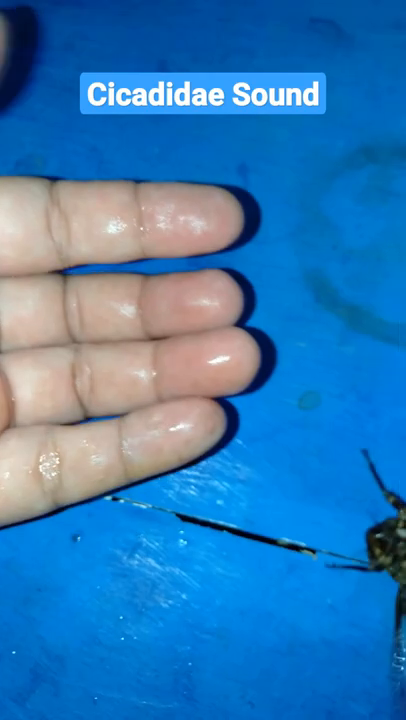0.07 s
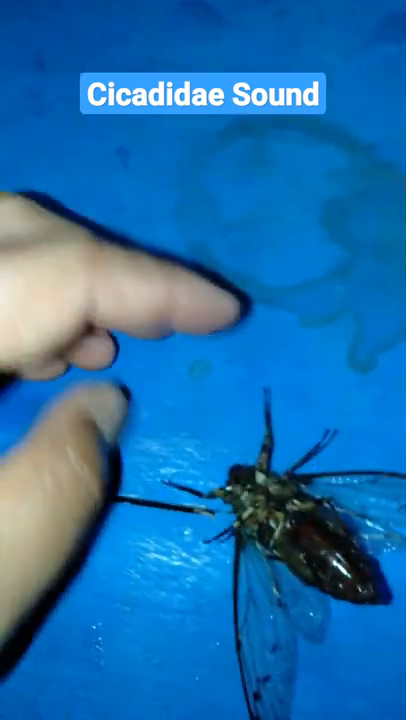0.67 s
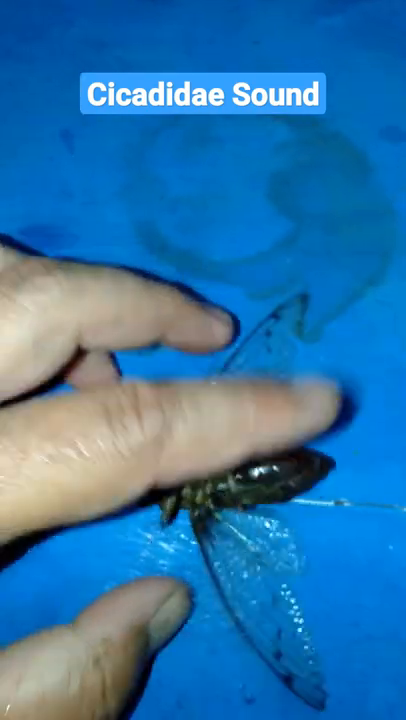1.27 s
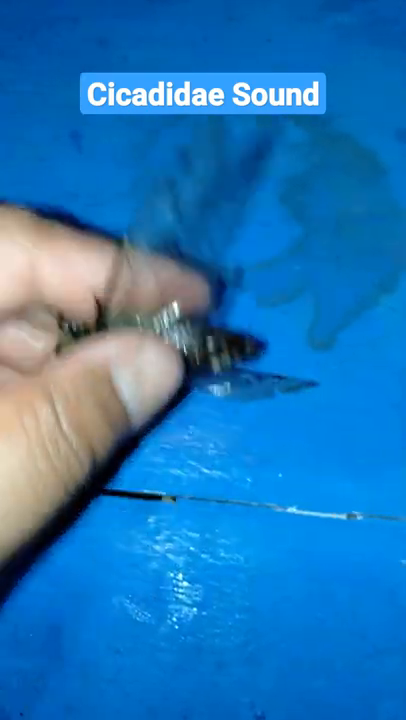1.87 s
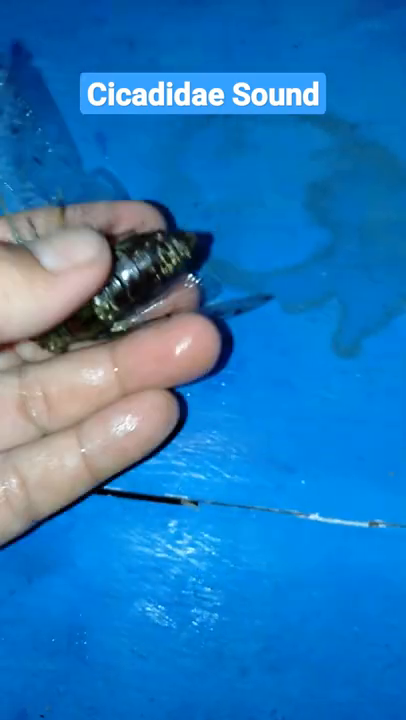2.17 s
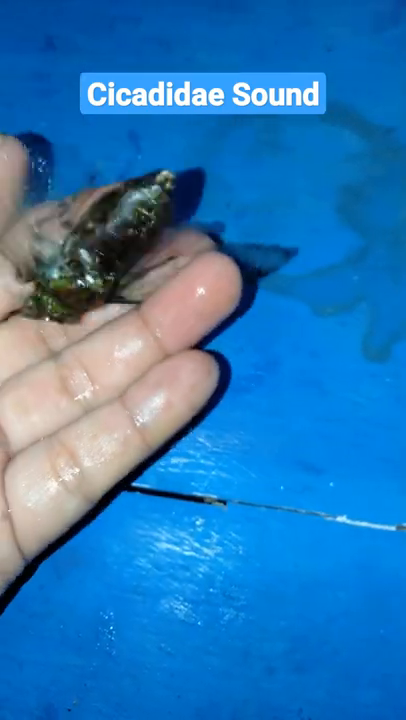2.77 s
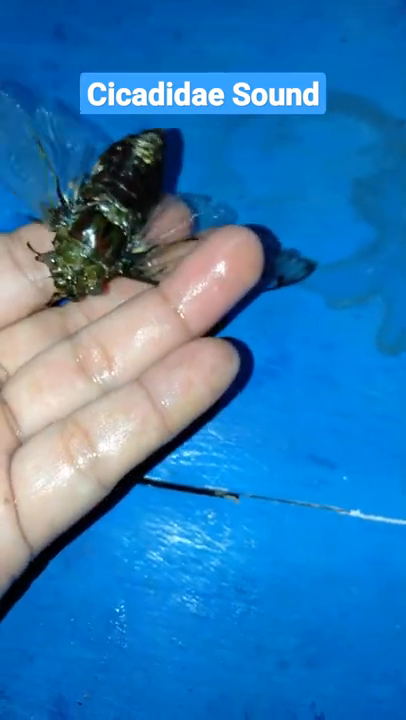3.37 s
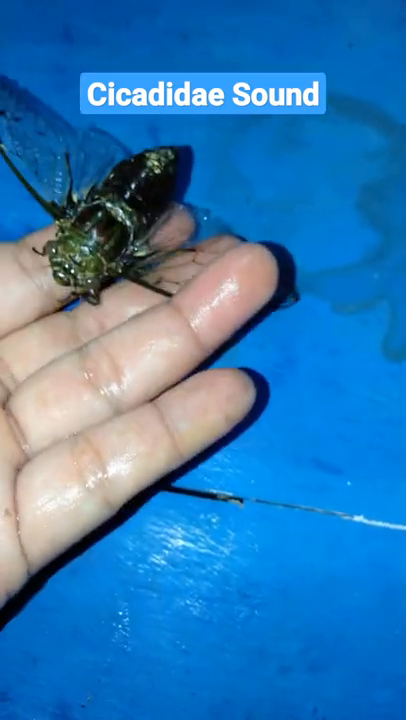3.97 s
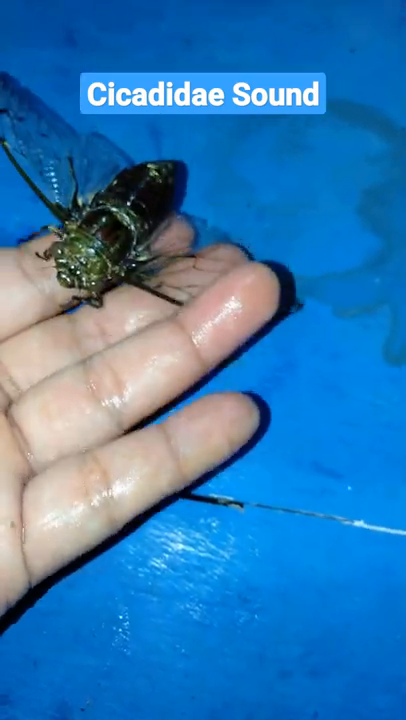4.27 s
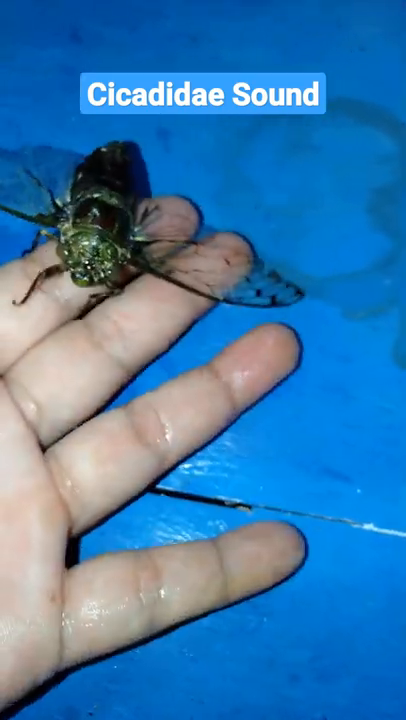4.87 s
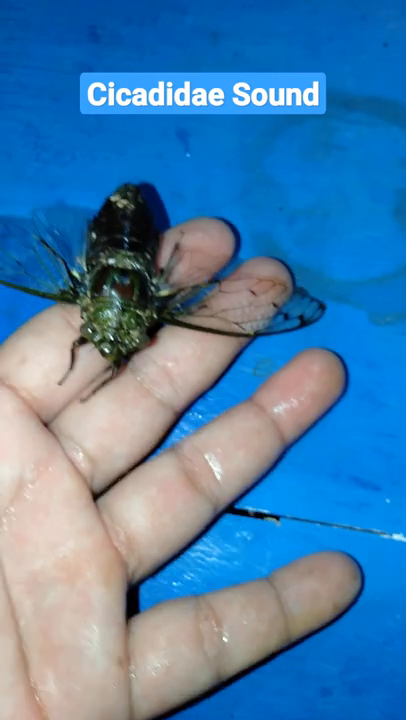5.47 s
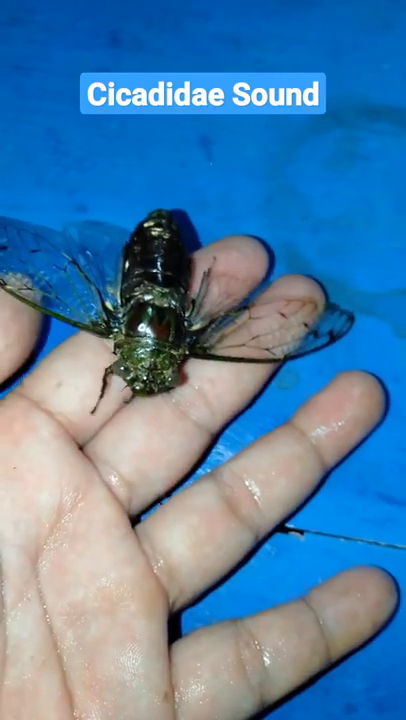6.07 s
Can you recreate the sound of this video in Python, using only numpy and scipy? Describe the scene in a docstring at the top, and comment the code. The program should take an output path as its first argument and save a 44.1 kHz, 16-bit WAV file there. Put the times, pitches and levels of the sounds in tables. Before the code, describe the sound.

Outdoors at night, a big cicada is picked up right next to the microphone. It lets out loud, harsh, buzzing screeches in short, irregular bursts. In the later bursts its dry wings flick quickly against the fingers in two brief flutters. After about four seconds it falls silent, leaving faint crickets and katydids trilling over a low rumble and hiss.

```python
"""Outdoors at night, at a table near walls: a big cicada is picked up by hand, close to the microphone.
It screeches in short protests and beats its wings. Its two tymbals buckle in turn, each about 100 times
a second: every stroke rings the hollow abdomen and snaps a row of ribs.
The walls return a faint echo; farther off, crickets and katydids sing over a low rumble and hiss."""
import sys
import numpy as np
from scipy import signal
from scipy.fft import rfft, irfft
from scipy.io import wavfile
from scipy.ndimage import uniform_filter1d

SR = 44100
rng = np.random.default_rng(int(sys.argv[2]) if len(sys.argv) > 2 else 0)


def transcribe(u):
    """Save the signal u as a 16-bit wav file named by the first command-line argument.

    u: samples, shape (n,) or (channels, n), limited to [-1, 1]; the rate is SR.
    q: integer samples, one column per channel.
    """
    v = np.clip(np.atleast_2d(u).T, -1, 1)
    q = np.round(v * 32767).astype(np.int16)
    wavfile.write(sys.argv[1], SR, q)


N = 274302
TIME = np.arange(N) / SR


def cicada():
    """Close to the microphone: one muscle rhythm drives both the abdomen and the ribs."""
    t, far = strokes()
    return abdomen(t, far) + ribs(t, far)


# screeches: start t/s, end t/s, stroke rate of one fresh tymbal f/Hz, abdomen f/Hz, its glide f/Hz,
# then relative: abdomen level/dB, rebound level/dB, rasp level/dB, rib ring level/dB, its change/dB
SCREECHES = [(.06, 0.158, 109.3, 1313, 60, -31, -28.5, -37, -46.5, 0),
             (0.281, 0.791, 108, 1277, -95, -29.5, -28.5, -34, -41, 7.5),
             (0.816, 0.973, 100.9, 1230, 0, -30.5, -33, -33.5, -34.5, -2.5),
             (.979, 1.115, 99.8, 1236, 30, -31, -33, -33, -34, 1),
             (1.143, 1.242, 99.9, 1240, 0, -31.5, -37, -33, -37, 2),
             (1.305, 1.44, 103.1, 1230, -30, -32.5, -42, -33, -35.5, 1.5),
             (1.609, 1.779, 108.8, 1220, 40, -34.5, -43.5, -34, -29, 0.5),
             (1.805, 1.86, 103, 1250, 30, -33.5, -38.5, -35.5, -32, -6),
             (1.968, 2.049, 105.8, 1215, 20, -35, -35.5, -37.5, -33.5, 0),
             (2.149, 2.271, 108, 1188, 60, -35, -36, -35.5, -29.5, -1.5),
             (2.614, 2.878, 109.8, 1252, 40, -35.5, -37, -36, -32.5, -4.5),
             (2.89, 2.961, 99.6, 1217, 20, -34, -38, -36, -38, 1),
             (3.03, 3.111, 105.5, 1260, 30, -33.5, -38, -36.5, -38.5, -4),
             (3.453, 3.541, 111, 1335, 50, -33.5, -36.5, -37, -39, -14),
             (3.562, 3.738, 105.3, 1390, 130, -31.5, -35.5, -37, -41, -5),
             (3.874, 3.938, 109.6, 1362, 40, -30.5, -36.5, -39, -35.5, -3)]
# the muscle falters in mid-screech: t/s, effort lost/share
FALTERS = [(.385, 0.088), (.517, 0.078), (.615, 0.059), (.69, 0.048), (1.022, .15), (1.215, 0.089),
           (1.381, .06), (2.8, 0.047), (3.575, .2)]


def muscle(times, tire_s=.1, release_s=.014, falter_s=.018, stretch_s=.0059):
    """Stroke rate, abdomen pitch and four levels: all sag as the muscle tires, falters and lets go."""
    rows = np.array(SCREECHES)
    which = np.searchsorted((rows[:-1, 1] + rows[1:, 0]) / 2, times)
    start, end, rate, pitch, glide, body_db, rebound_db, rasp_db, ring_db, change_db = rows[which].T
    age, left = np.clip(times - start, 0, end - start), np.maximum(end - times, 0)
    along = age / (end - start) - .5
    tiring = .12 * (1 - np.exp(-(age / tire_s) ** 2))
    release = .14 * np.exp(-left / release_s)
    faltering = sum(loss * np.exp(-((times - at) / falter_s) ** 2) for at, loss in FALTERS)
    slack = tiring + release + faltering  # share of the effort lost
    limp = np.exp(-age / stretch_s)  # the abdomen stretches at each start: its ring begins flat and weak
    return (rate * (1 - slack),
            (pitch + glide * along) * (1 - .04 * slack) - 59.7 * limp,
            body_db - 9 * slack - 1.6 * limp,
            rebound_db - 12.5 * slack,
            rasp_db - 8 * slack,
            ring_db + change_db * along - 8 * slack)


def strokes(lag_cycles=.48, stray_cycles=.029):
    """Stroke times and their tymbal (0 near, 1 far); the far one lags by a wandering half cycle."""
    rows, drift = [], walk(20)
    for start, end, *_ in SCREECHES:
        t = np.arange(start, end - .003, 1 / SR)
        cycles = np.cumsum(muscle(t)[0]) / SR
        stroke = np.arange(int(2 * cycles[-1]) + 1)
        far = stroke % 2
        even_times = np.interp(stroke / 2, cycles, t)
        lag = lag_cycles + stray_cycles * UNEVENNESS[posture(start)] * np.interp(even_times, TIME, drift)
        rows.append([np.interp(stroke // 2 + lag * far, cycles, t), far])
    times, far = np.concatenate(rows, axis=1)
    return jittered(times, ms=.14), far


# the insect is gripped, then perches: t/s
MOVES = [1.52, 2.45]


def posture(times):
    """0 lying on the table, 1 gripped, 2 perched on the fingers."""
    return np.searchsorted(MOVES, times)


# unevenness of the strokes when lying, gripped and perched: jitter/share
UNEVENNESS = [.3, 1, .65]


def jittered(times, ms):
    """Each time comes a little early or late, most of all while the insect is gripped."""
    return times + np.array(UNEVENNESS)[posture(times)] * ms * rng.standard_normal(len(times)) / 1000


# air modes of the abdomen: f/abdomen pitch, rise t/ms, relative level/dB
ABDOMEN_MODES = [(0.973, 0.76, 8), (1.17, 0.63, -3.5)]


def abdomen(t, far, drone_hz=710, rebound_hz=2020, rebound_s=.0042):
    """The air in the abdomen rings just after each stroke, and higher as the tymbal springs back."""
    _, pitch, body_db, rebound_db, _, ring_db = muscle(t)
    pitch = pitch * (1 + .02 * (1 - 2 * far)) * scatter(t, .1)
    push = undb(-1.5 * far) * scatter(t, .6)
    onset = t + .001864
    body = sum(grains(onset, push * undb(body_db + db + 3.5), peak_ms, ratio * pitch)
               for ratio, peak_ms, db in ABDOMEN_MODES)
    body = signal.sosfiltfilt(butter(4, [930, 1660], "band"), body)
    # the soft belly wall drones less evenly than the air inside, and grows with the rib ring
    drone_db = -36.5 + .53 * (ring_db + 34.5)
    drone = grains(jittered(onset, ms=.17), push * undb(drone_db), .9, drone_hz * scatter(t, .35))
    drone = signal.sosfiltfilt(butter(4, 570, "high"), drone)
    rebound = grains(t + rebound_s, push * undb(rebound_db + 1.5), 1, rebound_hz * scatter(t, .22))
    # the pumping itself hums faintly at the stroke rate
    throb = signal.sosfilt(butter(3, 160, "high"), grains(t, push * undb(body_db - 29), .53))
    return body + drone + rebound + throb


# tymbal modes as each posture shades them at the microphone:
# f/Hz, rise t/ms, then relative: lying level/dB, gripped level/dB, perched level/dB
TYMBAL_MODES = [(2540, .5, 1, -4.5, -7), (2930, 0.49, 0.5, -5, -10), (3183, 0.65, 1.5, 1, 0.5),
                (3861, 0.61, -9, 3.5, 8.5), (4204, 0.81, 5.5, 5, -5), (5660, 0.41, -12, -5, 5),
                (6125, 1, -4.5, -13, 7.5), (7940, 0.42, -9, -29, -9), (9700, 0.37, -13, -7, -7),
                (11080, 0.37, -12, -4.5, -8), (12550, 0.33, -10, -6, -9), (15400, 0.7, -1, -10, -5.5),
                (14820, 0.36, 3, 1.5, 2.5)]
# noise of the crumpling membrane: f/Hz, relative level/dB
CRUMPLE_SPECTRUM = [(1700, -12), (2400, -1), (3100, 4), (3700, -3), (4350, -0.5), (5300, -5), (6700, 0.5),
                    (9000, -9.5), (11000, -10.5), (12000, -30), (13600, -17), (14700, -19)]


def ribs(t, far, near_gap_s=.002, far_gap_s=.0017, ring_hz=6720):
    """Three ribs snap in turn in each stroke; every snap rings the tymbal and crumples it noisily."""
    rib = np.tile(np.arange(3), len(t))
    t, far = np.repeat(t, 3), np.repeat(far, 3)
    snaps = t + rib * np.where(far, far_gap_s, near_gap_s) + .00002 * rng.standard_normal(len(t))
    force = undb(-2 * rib) * scatter(snaps, 1.3)
    ring = grains(snaps, force * undb(-10 * far), .34, ring_hz * scatter(snaps, .19), count=256)
    force = force * undb(.5 * far)
    rasp = 0
    for hz, peak_ms, *shade_db in TYMBAL_MODES:
        # as the insect squirms, each mode drifts in strength and pitch
        sway, bend = (np.interp(snaps, TIME, walk(9)) for _ in range(2))
        mode_db = np.array(shade_db)[posture(t)] + 1.5 * sway
        size = force * undb(mode_db) / peak_ms * scatter(snaps, 1.8)
        mode_hz = hz * (1 + .012 * bend) * scatter(snaps, .09)
        rasp = rasp + grains(snaps, size, peak_ms, mode_hz, count=256)
    crumple = colour(grains(snaps, force, .26, count=256) * noise(), CRUMPLE_SPECTRUM)
    *_, rasp_db, ring_db = muscle(TIME)
    duty = sum(end - start for start, end, *_ in SCREECHES) * SR / N  # share of time spent screeching
    layers = [(rasp, rasp_db), (crumple, rasp_db - 6), (ring, ring_db - .6)]
    return np.sqrt(duty) * sum(unit(x) * undb(db) for x, db in layers)


# bouts of wing beating: first t/s, last t/s, strongest t/s, relative flick level/dB,
# relative puff level/dB, first beat's drop/dB, last beat's drop/dB
FLUTTERS = [(2.637, 3.123, 2.8, -46, -57.5, 5, 2), (3.459, 3.854, 3.71, -48.5, -57, 2, 10)]
# dry wing on skin: f/Hz, relative level/dB
FLICK_SPECTRUM = [(100, 4.5), (250, -0.5), (700, 9.5), (1500, 0), (4000, 1), (7000, 6), (12000, -9),
                  (16000, -23)]


def wings(beat_hz=20.3, puff_hz=52):
    """At the microphone, every beat flicks the dry wing against the fingers and pushes a puff of air."""
    beats = []
    for first, last, strongest, flick_db, puff_db, first_db, last_db in FLUTTERS:
        t = np.linspace(first, last, round((last - first) * beat_hz) + 1)
        fade_db = np.interp(t, [first, strongest, last], [first_db, 0, last_db])
        beats.append([t, flick_db - fade_db, puff_db - fade_db])
    t, flick_db, puff_db = np.concatenate(beats, axis=1)
    flicks = grains(t, undb(flick_db + 12), .98) * unit(colour(noise(), FLICK_SPECTRUM))
    puffs = grains(t - .004, undb(puff_db + 8), 4.5, puff_hz * scatter(t, 1.2), count=4096)
    return flicks + puffs


def wall_echo(x, t60_s=.38, wet_db=-25):
    """Nearby walls return a weak, dull tail to the microphone."""
    tail = noise() * np.exp(-np.log(1000) * TIME / t60_s) * (TIME > .005)
    tail = colour(tail, [(400, -17), (900, -10.5), (1500, 7.5), (2300, 4), (4000, -3.5),
                         (7000, -6), (14000, -99)])
    return undb(wet_db) * signal.fftconvolve(x, tail / np.sqrt(np.sum(tail ** 2)))[:N]


# insects trilling all around: f/Hz, width f/Hz, level/dB, pulse f/Hz, pulse depth/share
TRILLS = [(5740, 250, -71.5, 83, 0), (6870, 370, -57.5, 33, 0.62), (7330, 1290, -55.5, 48, 0),
          (7870, 430, -62, 36.3, 0.9), (8510, 230, -63.5, 36.3, 0.4), (2676, 196, -66, 10, 0.14)]


def trills():
    """Farther off, katydids and crickets trill in narrow bands that pulse with each wing stroke."""
    out = 0
    for hz, width_hz, db, pulse_hz, depth in TRILLS:
        phase = np.cumsum(pulse_hz * (1 + .0094 * walk(7.1))) / SR + rng.random()
        pulse = unit(1 + depth * np.cos(2 * np.pi * phase))
        out = out + band(hz, width_hz) * pulse * undb(db + .88 * walk(3.38))
    return out


def cricket_chirps(hz=2630, sag_hz=50, period_s=.21, gain_db=-62):
    """In the distance, lower crickets chirp in slow time, their pitch sagging as they swell."""
    swell = .6 + .392 * np.cos(2 * np.pi * (TIME - 3.8) / period_s + .624 * walk(3))
    phase = np.cumsum(hz + sag_hz * (1 - 2 * swell) + 50 * walk(60)) / SR
    roughness = undb(2 * walk(30)) * band(82, 98)
    return undb(gain_db) * swell * roughness * unit(np.sin(2 * np.pi * phase))


# outdoor rumble: f/Hz, relative level/dB
RUMBLE_SPECTRUM = [(15, -23), (25, -2), (130, -8), (276, -15), (350, -16.5), (757, -18), (800, -14.5),
                   (943, -19.5), (2000, -21), (2600, -34), (4400, -120)]
# high hiss: f/Hz, relative level/dB
HISS_SPECTRUM = [(1700, -27), (2200, 10), (3300, 2.5), (4100, 0.5), (4700, 5.5), (6500, -30), (9300, -35),
                 (11000, 2), (13000, -5), (14100, 8.5), (15700, -2.5)]


def night_air(rumble_db=-65, hiss_db=-68):
    """Behind everything lie a low, wavering outdoor rumble and an even hiss."""
    rumble = unit(colour(noise(), RUMBLE_SPECTRUM)) * undb(rumble_db + .71 * walk(3.67))
    return rumble + undb(hiss_db) * unit(colour(noise(), HISS_SPECTRUM))


def grains(times, size, peak_ms, hz=None, count=1024):
    """A swell that peaks and dies away at each time; with a frequency it is a damped ring."""
    index = (times * SR).astype(int)[:, None] + 1 + np.arange(count)
    age = index / SR - times[:, None]
    rise = age / (peak_ms / 1000)
    wave = size[:, None] * rise * np.exp(1 - rise)
    if hz is not None:
        wave = wave * np.sin(2 * np.pi * hz[:, None] * age)
    return np.bincount(np.clip(index, 0, N).ravel(), wave.ravel(), N + 1)[:N]


def colour(x, points, size=2048):
    """Causal filter with the given spectrum: f/Hz, level/dB."""
    hz, db = np.transpose(points)
    grid = np.maximum(np.arange(size // 2 + 1) * SR / size, 1)
    gain = undb(np.interp(np.log(grid), np.log(hz), db))
    cepstrum = irfft(np.log(gain))
    cepstrum[1:size // 2] *= 2  # folded for minimum phase
    cepstrum[size // 2 + 1:] = 0
    return signal.fftconvolve(x, irfft(np.exp(rfft(cepstrum))))[:N]


def band(hz, width_hz):
    """A band of noise, rms 1."""
    edges = [max(hz - width_hz / 2, 10), hz + width_hz / 2]
    return unit(signal.sosfilt(butter(2, edges, "band"), noise()))


def walk(rate_hz):
    """Smooth random drift, rms 1."""
    hold = int(SR / rate_hz)
    steps = np.repeat(rng.standard_normal(N // hold + 2), hold)
    return unit(uniform_filter1d(steps, hold)[:N])


def scatter(times, db):
    """A random factor near 1 for each of the times."""
    return undb(db * rng.standard_normal(len(times)))


def butter(order, hz, kind):
    return signal.butter(order, hz, kind, fs=SR, output="sos")


def undb(db):
    return 10 ** (np.asarray(db) / 20)


def unit(x):
    return x / np.sqrt(np.mean(x ** 2))


def noise():
    return rng.standard_normal(N)


def scene():
    """One microphone: the cicada close up, its echo, and the night around it."""
    insect = cicada() + wings()
    return (insect + wall_echo(insect) + trills() + cricket_chirps() + night_air())[None]


def record(dry, top_hz=15700):
    """The recorder cuts the top steeply."""
    return signal.sosfilt(signal.ellip(10, .2, 75, top_hz, fs=SR, output="sos"), dry)


dry = scene()
out = record(dry)
transcribe(out)
```